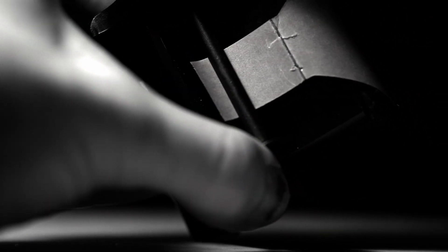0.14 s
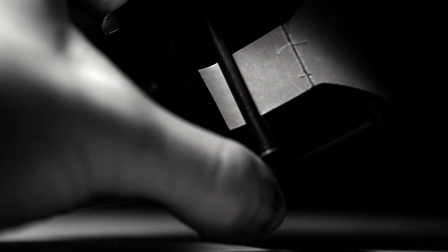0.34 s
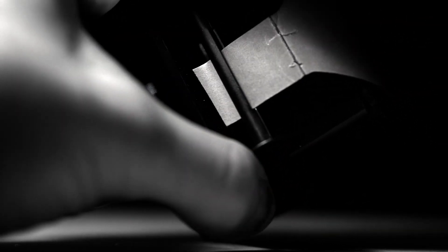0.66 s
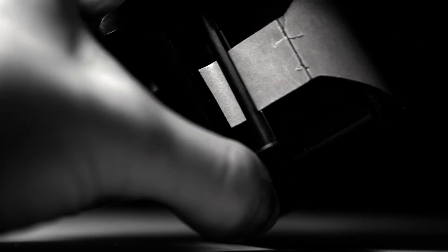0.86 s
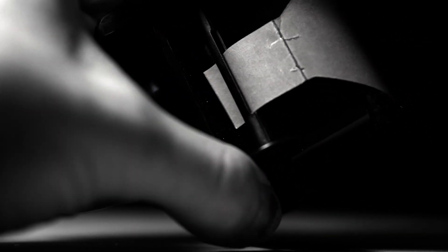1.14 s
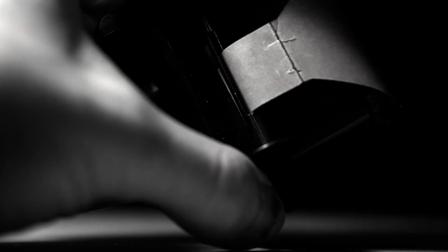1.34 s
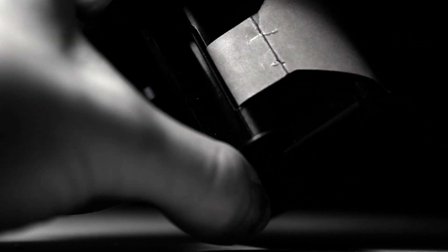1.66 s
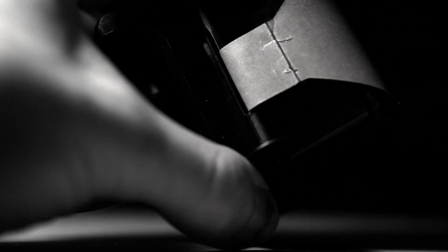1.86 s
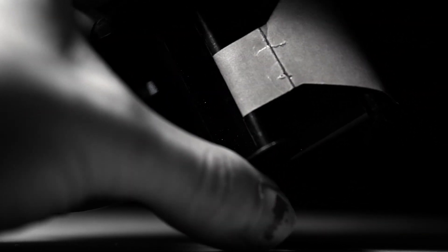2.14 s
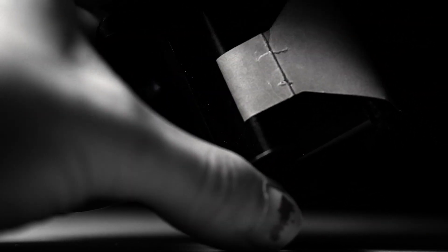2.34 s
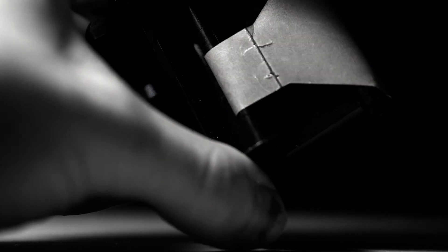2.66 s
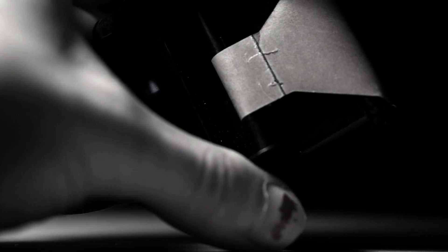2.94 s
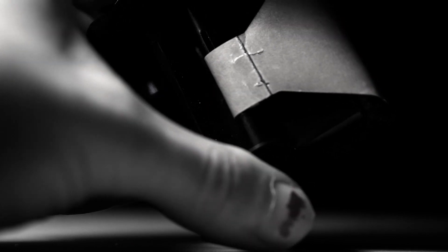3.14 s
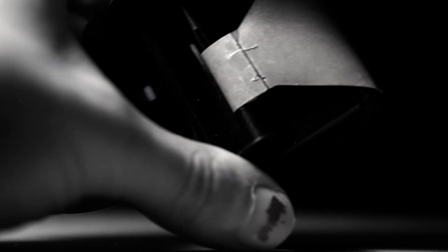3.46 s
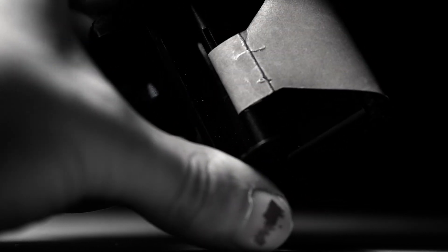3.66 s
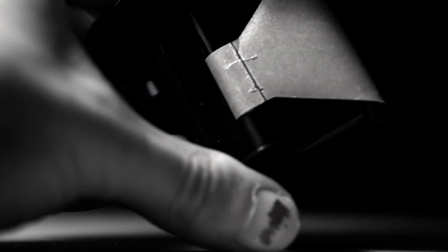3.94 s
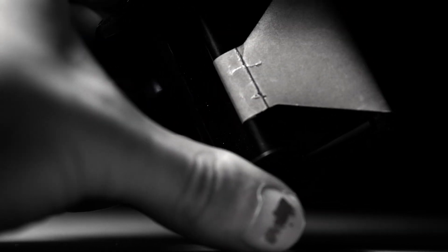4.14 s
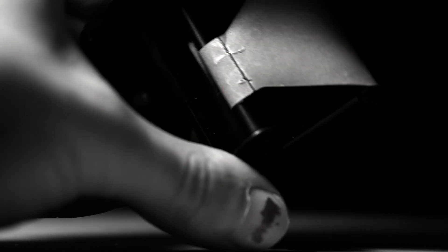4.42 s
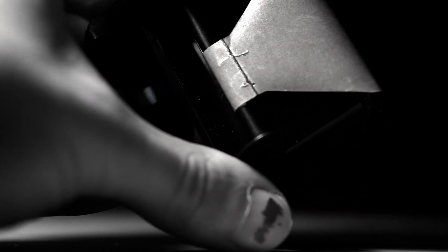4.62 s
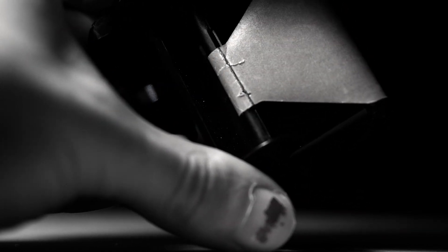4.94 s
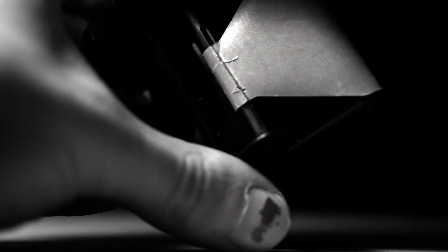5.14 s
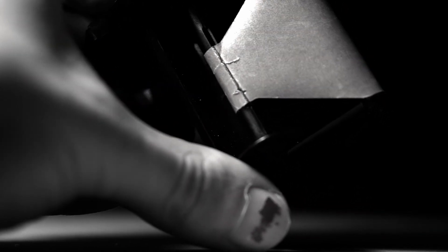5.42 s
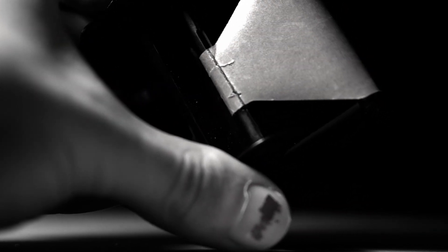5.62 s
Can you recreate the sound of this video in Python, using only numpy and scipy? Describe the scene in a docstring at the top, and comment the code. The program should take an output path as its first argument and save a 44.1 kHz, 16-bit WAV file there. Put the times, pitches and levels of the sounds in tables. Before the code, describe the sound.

Very close in a small quiet room, a hand winds a paper-backed film roll into an open camera. Bright ratchet clicks come in six short runs with brief gaps. Early on the paper only rubs faintly; from about three seconds it tightens, with hollow cracks and creaks between clicks. Soft low thuds of the camera body and faint metallic ringing follow, over slight hiss and deep rumble.

```python
"""In a small quiet room, close to the microphone, a roll of film is wound into an open camera.
The winding ratchet clicks in short runs; the paper leader rubs, then creaks and snaps as it tightens.
Landings of the pawl and shifts of the hand bump the camera body softly; its metal parts ring faintly.
Clicks, creaks and bumps are shaped noise and pushes through resonant filters, heard direct and off the walls."""
import sys
import numpy as np
from scipy import signal
from scipy.fft import rfft, irfft, next_fast_len
from scipy.io import wavfile

SR = 44100
rng = np.random.default_rng(int(sys.argv[2]) if len(sys.argv) > 2 else 0)


def put_to_file(sound):
    """Save the sound as 16-bit audio at rate SR, in the file named by the first command-line argument."""
    columns = np.atleast_2d(sound).T  # one column per channel
    safe = np.clip(columns, -1, 1)
    whole_steps = np.round(safe * 32767)
    wavfile.write(sys.argv[1], SR, whole_steps.astype(np.int16))


N = 254879
TAPS = 2048  # samples in one contact sound
HZ = np.fft.rfftfreq(TAPS, 1 / SR)
AGE = np.arange(TAPS) / SR  # s since the contact began

# Turns of the winding knob: start t/s, paper tension/0-1, zing level re slip or ride/dB before trim,
# first jolt level/dB before trim, first boom gain/dB
TURNS = [(0.3, 0, -9, -49.5, -12), (1.0, .17, -6, -44, -3), (2.0, .1, 1.5, -43, 1), (2.9, .62, -8, -41, -9),
         (3.85, 1, -14, -46, -4), (4.75, .9, -14, -46.5, 0)]
# Ratchet teeth: slip t/s, wait until the pawl lands/s, slip level/dB, landing level/dB, ring f/Hz
# (the levels are references that each part of the click is set against)
TEETH = [(0.4186, 0, -39.5, -40, 2630), (0.5797, 0, -37.5, -34.5, 2600), (1.0728, .002, -36, -34.5, 2640),
         (1.1672, .003, -38.5, -36, 4200), (1.2626, .0067, -39, -39, 4410),
         (1.3251, .0072, -37, -42.5, 2440), (1.3778, .011, -37.5, -45, 2400),
         (1.4998, .009, -34.5, -43, 4120), (1.5477, .0087, -37, -42, 2300),
         (2.0426, .012, -35.5, -47, 3050), (2.1224, .0102, -36, -47, 3750),
         (2.1877, .0086, -36.5, -48, 3940), (2.2514, .007, -39.5, -47, 2740),
         (2.3321, .006, -44, -43, 2370), (2.4843, .0006, -49, -35.5, 2620), (2.5155, 0, -42.5, -32.5, 3780),
         (2.9833, 0, -38.5, -32.5, 2660), (3.0702, .0015, -35, -32, 3120), (3.1237, 0, -33, -36, 2900),
         (3.2056, 0, -37, -32.5, 4300), (3.2582, 0, -33, -33, 4270), (3.4244, 0, -39, -41, 4300),
         (3.9204, 0, -41.5, -36.5, 2960), (4.0017, 0, -39, -34.5, 3030), (4.0432, 0, -38.5, -34, 3140),
         (4.1046, 0, -38, -34, 3570), (4.1378, 0, -42.5, -37.5, 3110), (4.2697, 0, -49, -38, 4540),
         (4.3477, 0, -44.5, -40, 4380), (4.8368, 0, -33, -33, 3860), (4.8577, 0, -33, -33.5, 2620),
         (4.8898, 0, -42, -34, 3330), (4.9684, .0025, -37, -33, 3830), (5.0159, .0077, -35.5, -36, 3500),
         (5.149, 0, -41, -47, 3360), (5.1693, 0, -43, -39, 4000)]


def amp(db):
    """Decibels to gain."""
    return 10 ** (np.asarray(db) / 20)


def evened(x):
    """Scales to rms 1."""
    return x / np.sqrt(np.mean(x ** 2) + 1e-20)


def read(points, hz):
    """Reads a table along a logarithmic frequency axis."""
    f, value = np.transpose(points)
    return np.interp(np.log(hz + 1), np.log(f + 1), value)


def add(mix, s, sound):
    """Mixes a sound in at time s."""
    part = mix[max(round(s * SR), 0):][:len(sound)]
    part += sound[:len(part)]


def shaped(x, points):
    """Gives a long signal a spectrum, at rms 1."""
    size = next_fast_len(N, True)
    gain = amp(read(points, np.fft.rfftfreq(size, 1 / SR)))
    return evened(irfft(rfft(x, size) * gain, size)[:N])


def colour(points):
    """A part's response in dB, falling away steeply above its last point."""
    return read(points, HZ) - 60 * np.log10(np.maximum(HZ / points[-1][0], 1))


def peak(hz, width_hz, added_db):
    """One resonance in dB, whose power at added_db joins the response beneath it."""
    return 10 * np.log10(1 + amp(added_db) ** 2 / (1 + (2 * (HZ - hz) / width_hz) ** 2))


def causal(response_db):
    """The minimum-phase filter of a response: it rings only after the push."""
    cepstrum = irfft(response_db * np.log(10) / 20)
    cepstrum[1:TAPS // 2] *= 2
    cepstrum[TAPS // 2 + 1:] = 0
    return np.exp(rfft(cepstrum))


def sized(sound, db):
    """Sets a contact's energy, as an rms level over 5 ms."""
    click_s = .005
    return amp(db) * evened(sound) * np.sqrt(click_s * SR / TAPS)


def ring(push, body, db):
    """A push heard through the part that it strikes."""
    return sized(irfft(rfft(push) * body), db)


def chatter(decay, rise, linger_db=-14, linger_s=0.0036):
    """A contact: tiny impacts that swell and die within milliseconds, then linger weakly in the body."""
    swell = 1 - np.exp(-(AGE / rise) ** 2)
    dying = np.exp(-AGE / max(decay, 1e-4))
    lingering = amp(linger_db) * np.exp(-AGE / linger_s)
    return rng.standard_normal(TAPS) * swell * np.hypot(dying, lingering)


def blow(decay, rise, scatter):
    """One clean push amid some chatter."""
    push = scatter * evened(chatter(decay, rise)) / np.sqrt(TAPS)
    push[round(rise * SR)] += 1
    return push


def turn_at(s):
    """The turn of the knob that is under way at time s, or the first turn if none has begun."""
    return TURNS[max(sum(turn[0] <= s for turn in TURNS) - 1, 0)]


def through_turns():
    """Paper tension and boom gain in dB at every moment; the boom eases as the grip closes on the back."""
    boom_ease_db_per_s = 18
    starts, tension, _, _, boom_db = np.transpose(TURNS)
    t = np.arange(N) / SR
    turn = np.maximum(np.searchsorted(starts, t) - 1, 0)
    since_start = np.maximum(t - starts[turn], 0)
    return tension[turn], boom_db[turn] - boom_ease_db_per_s * since_start


def background():
    """Faint hiss of the quiet room and the recorder, over the deep rumble of the room."""
    # Spectrum of the hiss: f/Hz, relative level/dB per Hz
    hiss_colour = [(40, -5), (70, -3.5), (170, -5), (280, -3), (430, -10), (800, -12.5), (1200, -17),
                   (2000, -20.5), (2700, -17), (4300, -23.5), (5500, -27), (10000, -28), (16000, -30.5)]
    # Spectrum of the rumble: f/Hz, relative level/dB per Hz
    rumble_colour = [(3, -22), (7, -0.5), (21, 3.5), (43, -10), (70, -15), (100, -36), (150, -67)]
    hiss = amp(-72) * shaped(rng.standard_normal(N), hiss_colour)
    rumble = amp(-62.5) * shaped(rng.standard_normal(N), rumble_colour)
    return hiss + rumble


def creaks():
    """Taut paper slips on the spool: a short crack, and the hollow roll rings for a few cycles."""
    # Slips of the paper: t/s, hollow knock level/dB before trims, knock f/Hz, crack level/dB
    slips = [(0.0925, -64, 790, -71), (0.3218, -54, 1450, -63), (0.747, -68, 1420, -59.5),
             (0.797, -67, 614, -68), (1.683, -56, 620, -62.5), (2.0548, -45.5, 970, -46),
             (2.1326, -50, 690, -46.5), (2.1963, -49, 1000, -49), (2.244, -52, 1300, -54),
             (2.3032, -56.5, 1270, -56), (2.3932, -52, 1230, -48.5), (2.4358, -51, 1340, -52),
             (2.607, -56, 820, -49), (2.691, -54.5, 1230, -63), (2.776, -50, 1210, -56),
             (2.9622, -44, 1210, -47), (3.0687, -25, 1255, -28), (3.0715, -27, 1300, -34),
             (3.3256, -35.5, 850, -41), (3.3534, -38.5, 860, -42.5), (3.4513, -48.5, 795, -60),
             (3.4724, -49, 750, -62), (3.5807, -44.5, 850, -54.5), (3.586, -49, 750, -57),
             (3.6167, -48, 900, -56), (3.6798, -53.5, 840, -74), (3.7312, -49.5, 880, -53),
             (3.7917, -39, 800, -46), (3.812, -50, 830, -59), (3.8464, -41.5, 1210, -46),
             (3.8558, -40, 880, -53), (3.8729, -42, 1030, -53), (4.2387, -27.5, 875, -33),
             (4.3657, -38.5, 820, -60), (4.4007, -47, 810, -44), (4.4178, -33.5, 837, -42),
             (4.456, -39.5, 890, -43), (4.4782, -43, 834, -46.5), (4.503, -44.5, 774, -44),
             (4.663, -56, 870, -72), (4.7404, -37, 865, -38), (4.7901, -33.5, 1274, -35),
             (4.9068, -38.5, 830, -50), (5.09, -36, 850, -37), (5.1085, -35, 870, -42),
             (5.2173, -42, 1360, -45), (5.4207, -34.5, 848, -39.5), (5.5378, -31, 874, -34),
             (5.6152, -34, 870, -37), (5.6257, -37, 880, -44), (5.6354, -37, 895, -40),
             (5.6398, -38, 890, -52), (5.6525, -42, 875, -52), (5.6626, -42.5, 870, -50),
             (5.6672, -37, 1000, -46), (5.7063, -45, 855, -54), (5.7615, -30.5, 870, -37)]
    # Response of the spool to a knock: f/Hz, relative level/dB
    knock_colour = [(100, -36.5), (180, -29.5), (320, -14), (480, -10.5), (800, 1), (1050, -2),
                    (1350, -2.5), (1650, -7), (2000, -21.5), (3200, -43.5)]
    # Response of the cracking sheet: f/Hz, relative level/dB
    crack_colour = [(1200, -28), (2000, -4), (2650, 0), (3300, -1.5), (3800, -9), (4400, -6.5), (5200, -25),
                    (7000, -42.5)]
    # Response of the fizzing fibres: f/Hz, relative level/dB
    crisp_colour = [(3500, -33), (5500, -6.5), (6700, 6), (7700, 0.5), (10000, -0.5), (13000, -7),
                    (16000, -11)]
    # a hard slip is over sooner than a gentle one
    firm_decay_s, firm_db, db_per_halving = .00073, -38, 17  # each part stretches this decay
    fibres_db = -19  # re the crack
    # slips pitched above the hollow of the roll excite it less
    hollow_hz, hollow_db_per_octave = 900, -7
    out = np.zeros(N)
    spool, sheet, fibres = (causal(colour(part)) for part in (knock_colour, crack_colour, crisp_colour))
    hollow = (1 - np.exp(-AGE / 0.00077)) * np.exp(-AGE / 0.0021)
    for s, knock_db, knock_hz, crack_db in slips:
        decay = firm_decay_s * 2 ** ((firm_db - knock_db) / db_per_halving)
        miss_db = hollow_db_per_octave * max(np.log2(knock_hz / hollow_hz), 0)
        knock = blow(decay * 2.7, rise=0.00049, scatter=2.7)
        add(out, s, ring(knock, spool, knock_db - 2.8 + miss_db))
        add(out, s, sized(np.sin(2 * np.pi * knock_hz * AGE) * hollow, knock_db - 2.2))
        add(out, s, ring(blow(decay * 1.7, rise=.0005, scatter=2.05), sheet, crack_db))
        add(out, s, ring(chatter(decay * 1.5, rise=0.00032), fibres, crack_db + fibres_db))
    return out


def grains(per_s, spread_db, smooth):
    """Fibres catching: random ticks of uneven size over a smooth rub."""
    sizes = amp(spread_db * np.minimum(rng.exponential(1, N), 4))
    ticks = (rng.random(N) < per_s / SR) * rng.standard_normal(N) * sizes
    return evened(ticks) + smooth * rng.standard_normal(N)


def slide():
    """The paper leader drags across the film gate in short strokes, its fibres catching as it goes."""
    # Longer drags of the leader: middle t/s, length/s, rub level/dB, hiss level/dB
    drags = [(0.254, 0.067, -70, -78), (0.305, 0.075, -57, -69), (0.41, 0.2, -68, -77), (.82, .3, -78, -94),
             (0.944, .06, -68, -84), (1.694, 0.08, -69, -83), (1.812, 0.033, -69.5, -84),
             (1.985, .1, -73, -81), (2.035, 0.025, -53.5, -72), (2.168, 0.23, -66, -68),
             (2.37, .24, -61.5, -73), (2.634, .021, -63, -73), (2.737, 0.22, -66.5, -79),
             (3.204, 0.022, -48, -58), (3.659, .027, -69, -95), (3.91, 0.13, -62, -73),
             (4.827, 0.046, -57, -67), (5.385, .04, -63, -73)]
    # Spectrum of the rubbing paper: f/Hz, relative level/dB per Hz
    rub_colour = [(200, -17), (400, -6.5), (800, -2.5), (1100, -5), (1500, 3.5), (1900, -3.5), (2700, 1.5),
                  (3400, -4.5), (4200, -5.5), (5500, -27.5)]
    # Spectrum of its hiss and snaps: f/Hz, relative level/dB per Hz
    hiss_colour = [(3500, -18), (6000, 1), (9500, 5), (13000, -10), (16000, -7)]
    # each tooth lets the paper creep on: it rasps, and a few fibres snap
    creep_s, creep_lead_s = .12, .035
    creep_rub_db, creep_hiss_db, creep_snap_db = -32, -38, -36  # re the tooth's slip level
    rub, hiss, creep = np.zeros((3, N))
    for middle, length, rub_db, hiss_db in drags:
        stroke = np.hanning(max(round(length * SR), 8))
        add(rub, middle - length / 2, amp(rub_db) * stroke)
        add(hiss, middle - length / 2, amp(hiss_db) * stroke)
    for s, _, slip_db, _, _ in TEETH:
        add(creep, s - creep_lead_s, amp(slip_db) * np.hanning(round(creep_s * SR)))
    rub = np.hypot(rub, amp(creep_rub_db) * creep)
    hiss = np.hypot(hiss, amp(creep_hiss_db) * creep)
    fibres = grains(per_s=1300, spread_db=2.8, smooth=0.7)
    snapping = grains(per_s=120, spread_db=2.3, smooth=0.1)
    snaps = amp(creep_snap_db) * creep * shaped(snapping, hiss_colour)
    return rub * shaped(fibres, rub_colour) + hiss * shaped(fibres, hiss_colour) + snaps


def jolts():
    """What shakes the body, as (s, dB): the landing pawl, steadied through each turn, and the hand."""
    # The hand shifts its hold on the camera: t/s, level/dB before trim
    shifts = [(0.31, -56), (0.441, -50), (0.51, -56), (.75, -55), (0.797, -58), (.945, -55), (1.09, -46),
              (1.681, -49.5), (1.821, -59), (2.033, -50), (2.39, -52), (2.437, -52), (2.606, -43),
              (2.633, -51), (2.777, -52), (2.96, -49), (3.322, -51), (3.579, -49), (3.87, -47.5),
              (4.5, -47), (5.25, -55)]
    ease_db_per_s = 15  # the hand steadies through each turn
    for s, wait, *_ in TEETH:
        start, _, _, first_db, _ = turn_at(s)
        yield s + wait, first_db - ease_db_per_s * (s - start)
    yield from shifts


def bumps():
    """The hand damps the camera body, so each jolt is a short low thud."""
    # Response of the held body: f/Hz, relative level/dB
    body_colour = [(30, -20), (65, -6), (98, -0.5), (140, -7), (240, 0), (320, -3.5), (430, -14),
                   (800, -35)]
    out, body = np.zeros(N), causal(colour(body_colour))
    for s, db in jolts():
        add(out, s, ring(blow(decay=0.0082, rise=.001, scatter=0.98), body, db))
    return amp(0.5) * out


def boom(thuds):
    """The camera back rings low after a jolt unless the hand holds it."""
    t = np.arange(SR // 2) / SR
    mode = np.sin(2 * np.pi * 96 * t) * np.exp(-t / .035)
    _, boom_db = through_turns()
    freedom = amp(boom_db)
    return amp(-50) * signal.fftconvolve(thuds * freedom, mode)[:N]


def pawl_contacts():
    """The pawl scrapes up a tooth, slips off with a bright tick, then lands with a duller one.

    Yields s, decay s before stretching, then case dB, ring dB, ring Hz, fizz dB, zing dB before trims."""
    ride_lead_s, ride_decay_s, ride_slack_db, ride_taut_db = .003, .0016, -36, -19  # dB re the slip
    slip_decay_s, slip_case_db, slip_ring_db = .0008, -18, -9
    land_slack_s, land_taut_s, land_fizz_db, land_zing_db = .0014, .0009, -8, -23
    case_slack_db, case_taut_db = -11.5, -1  # taut paper carries the pawl's knock into the case
    for s, wait, slip_db, land_db, ring_hz in TEETH:
        _, tension, zing_db, _, _ = turn_at(s)
        taut = np.clip(tension, 0, 1)
        case_db = case_slack_db + taut * (case_taut_db - case_slack_db)
        land_decay = land_slack_s + taut * (land_taut_s - land_slack_s)
        ride_db = slip_db + ride_slack_db + taut * (ride_taut_db - ride_slack_db)
        # the ride has the slip's colour
        for at, decay, db in ((s - ride_lead_s, ride_decay_s, ride_db), (s, slip_decay_s, slip_db)):
            yield at, decay, db + slip_case_db, db + slip_ring_db, ring_hz, db, db + zing_db
        yield (s + max(wait, 0), land_decay, land_db + case_db, land_db, ring_hz,
               land_db + land_fizz_db, land_db + land_zing_db)


def ratchet():
    """The pawl works over each tooth: the case knocks, the spring rings, the edges fizz, the tip zings."""
    # Response of the case: f/Hz, relative level/dB
    case_colour = [(200, -21.5), (420, -13), (560, -6), (700, 0.5), (950, -4.5), (1300, -3.5), (1700, -10),
                   (2300, -31.5)]
    # Response of the spring beneath its ring peak: f/Hz, relative level/dB
    spring_colour = [(1100, -20), (1750, -7), (2600, -0.5), (3400, -0.5), (4400, -0.5), (4900, -6.5),
                     (5600, -35), (8000, -51)]
    # Response of the fizzing edges: f/Hz, relative level/dB
    edge_colour = [(4000, -22), (5400, -8), (6600, -3), (7500, -6), (9000, 0), (10500, 3), (12000, -6.5),
                   (13300, 0), (15000, -20)]
    # Response of the zinging tip: f/Hz, relative level/dB
    tip_colour = [(10000, -26), (13000, -20), (14200, -14), (15200, -1), (15900, -14), (17000, -23)]
    out, spring_db = np.zeros(N), colour(spring_colour)
    case, edges, tip = (causal(colour(part)) for part in (case_colour, edge_colour, tip_colour))
    for s, decay, case_db, ring_db, ring_hz, fizz_db, zing_db in pawl_contacts():
        spring = causal(spring_db + peak(ring_hz, width_hz=420, added_db=6.5))
        zing = chatter(decay * 1.3, rise=0.00053, linger_db=-21)
        add(out, s, ring(blow(decay * 3.4, rise=0.00057, scatter=3.5), case, case_db))
        add(out, s, ring(chatter(decay * 2.16, rise=0.00047), spring, ring_db))
        add(out, s, ring(chatter(decay * 2.0, rise=0.00052), edges, fizz_db))
        add(out, s, ring(zing, tip, zing_db + 0.87))
    return amp(-0.6) * out


def metal(clicks):
    """Spindle, springs and frame ring on faintly after each click, as decaying sines."""
    # Metal parts of the camera: f/Hz, relative level/dB, t60/s
    parts = [(695, -24, 0.33), (1250, -40, .3), (2720, -31, 0.24), (3950, -34, .25), (9620, -47, .3)]
    t = np.arange(SR) / SR
    modes = sum(amp(db - 60 * t / t60) * np.sin(2 * np.pi * hz * t) for hz, db, t60 in parts)
    return amp(-32) * signal.fftconvolve(clicks, modes)[:N]


def spindle(clicks):
    """The spindle sings thinly in a cluster of close high modes; taut paper lets clicks drive it less."""
    centre_hz, spread_hz, t60_s, level_db, taut_db = 5980, 170, .65, -62, -15  # spread is either way
    t = np.arange(SR) / SR
    pitches = centre_hz + spread_hz * rng.uniform(-1, 1, size=(8, 1))
    cluster = evened(np.sin(2 * np.pi * pitches * t).sum(0))
    modes = cluster * amp(level_db - 60 * t / t60_s)
    tension, _ = through_turns()
    return signal.fftconvolve(clicks * amp(taut_db * tension), modes)[:N]


def room(x):
    """Scattered reflections that set in after a short delay and die band by band."""
    # Decay of the small room: f/Hz, t60/s
    decay_times = [(100, 0.02), (300, 0.68), (1000, 0.41), (3500, 0.48), (9000, 0.31), (16000, 0.47)]
    # Colour of its answer: f/Hz, relative level/dB
    answer_colour = [(100, -4.5), (400, -6.5), (900, -2.5), (1400, -1.5), (2000, -5.5), (4000, -8.5),
                     (6000, -3), (9000, -6), (13000, -12.5), (15500, -18.5)]
    t = np.arange(SR) / SR
    onset = np.clip((t - .004) / 0.0041, 0, 1)
    taps = rng.standard_normal(SR) * (rng.random(SR) < .15) * onset
    hz, t, bands = signal.stft(taps, SR, nperseg=256)
    fade = amp(-60 * t / read(decay_times, hz)[:, None])
    tail = signal.istft(bands * fade, SR, nperseg=256)[1][:SR]
    gain = amp(read(answer_colour, np.fft.rfftfreq(SR, 1 / SR)))
    tail = irfft(rfft(tail / np.linalg.norm(tail)) * gain, SR)
    return signal.fftconvolve(x, tail)[:N]


def scene():
    """Ratchet, paper and body; what the clicks throw sideways reaches the walls with a different grain."""
    clicks, paper, thuds = ratchet(), creaks(), bumps()
    forward = room(amp(-9.5) * clicks + amp(-10) * paper + amp(-6) * thuds)
    sideways = room(amp(-8.5) * ratchet() + amp(-9.5) * creaks())
    direct = clicks + paper + thuds + boom(thuds) + metal(clicks) + spindle(clicks) + slide()
    return (direct + forward + sideways + background())[None]


def record(dry):
    """The recorder's band limit: a linear-phase low-pass at 16.3 kHz."""
    low_pass = signal.firwin(255, 16300, window=("kaiser", 9), fs=SR)
    return signal.oaconvolve(dry, low_pass[None], "same")


dry = scene()
out = record(dry)
put_to_file(out)
```